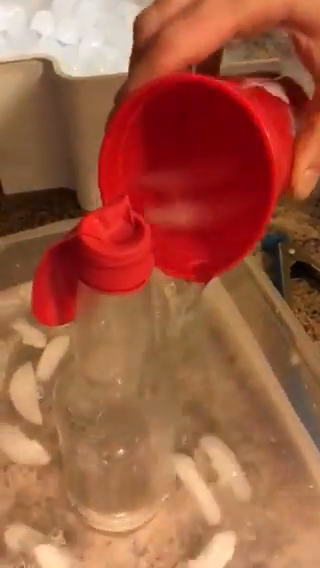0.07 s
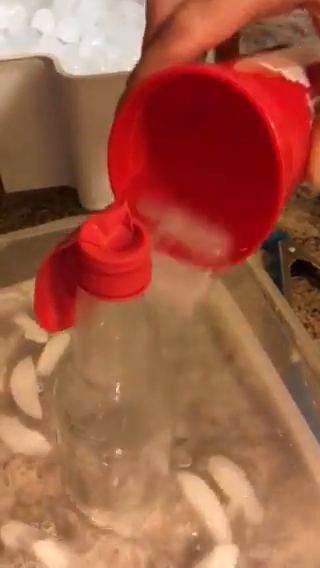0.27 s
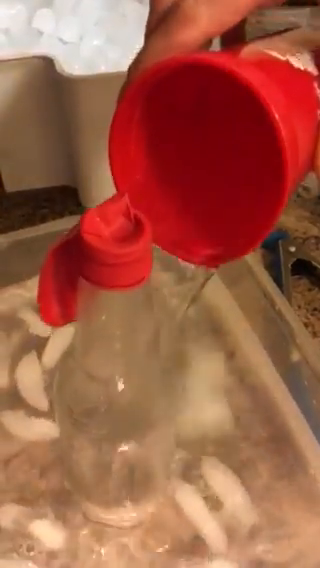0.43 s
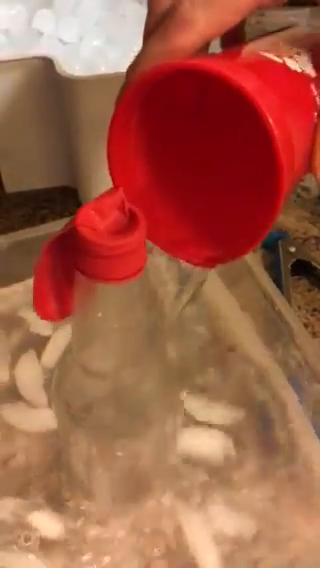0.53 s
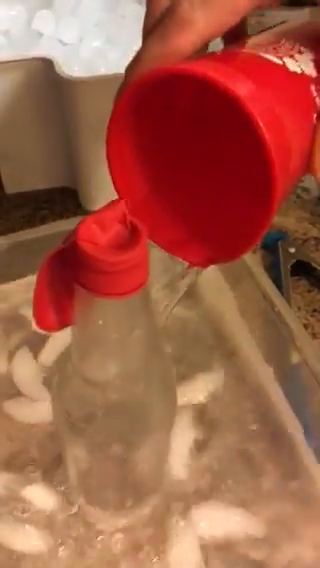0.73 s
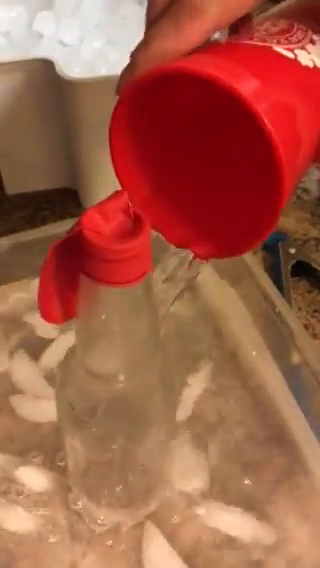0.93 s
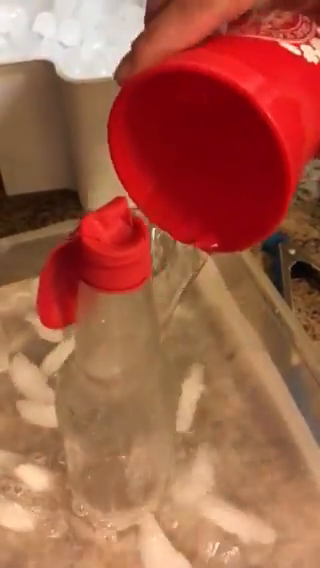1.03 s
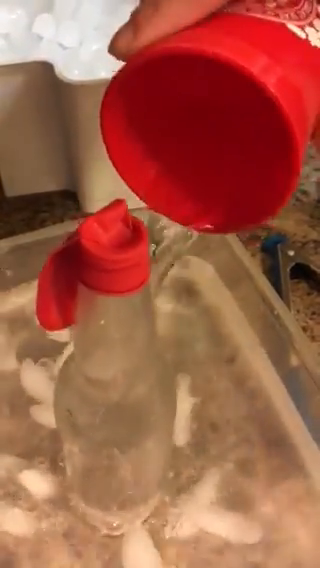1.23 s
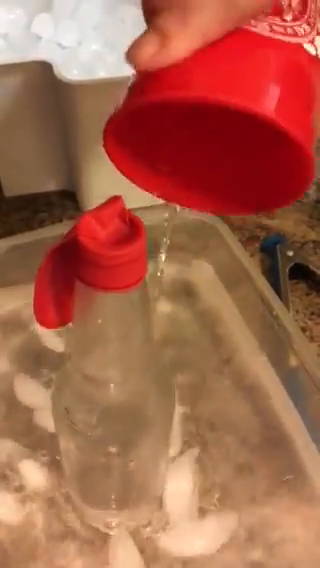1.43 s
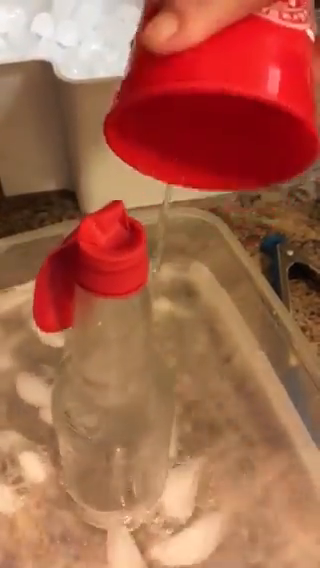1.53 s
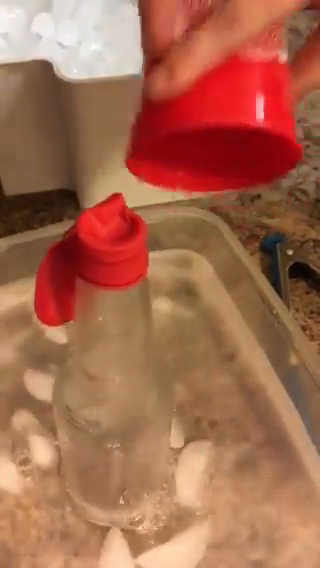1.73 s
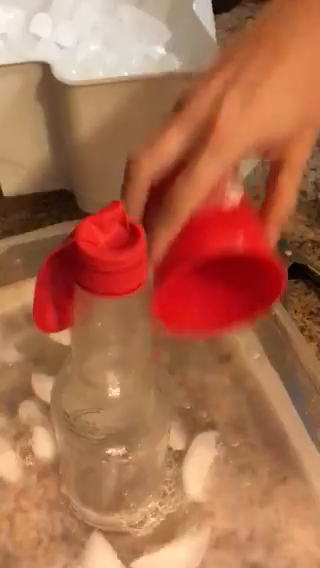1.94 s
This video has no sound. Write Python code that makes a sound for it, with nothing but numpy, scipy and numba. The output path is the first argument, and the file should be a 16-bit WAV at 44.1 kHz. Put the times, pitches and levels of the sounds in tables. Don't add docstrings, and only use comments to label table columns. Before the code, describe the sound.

Close phone pickup in a small kitchen: ice water pours, ice knocks hard on a glass bottle and plunges with a hollow tub boom, then floating ice taps and droplets thin out over faint fridge hum.

```python
import sys
import numpy as np
from scipy import signal
from scipy.fft import rfft, irfft
from scipy.io import wavfile
from scipy.ndimage import uniform_filter1d
from numba import njit

SR = 44100
rng = np.random.default_rng(int(sys.argv[2]) if len(sys.argv) > 2 else 0)


def voltage_ratio(level):
    return 10 ** (np.asarray(level, float) / 20)


def transcribe(u):
    v = np.clip(np.atleast_2d(u).T, -1, 1)
    q = np.round(v * 32767).astype(np.int16)
    wavfile.write(sys.argv[1], SR, q)


N = 88200

# [f/Hz, level/dB per Hz]
KITCHEN_AIR = [(25, -15), (60, 10.5), (300, -4), (900, -6), (3000, -20.5), (16000, -83)]
# [f/Hz, width/Hz, level/dB]
FRIDGE_HUM = [(119, 10, -58), (235.7, 16, -63.5), (419.7, 7.3, -67.5)]
# [t/s, level/dB]
FLOW = [(0, -48), (0.044, -59.5), (.14, -57), (0.202, -45), (.44, -37.5), (.49, -57), (.62, -37.5),
        (.75, -46), (1.0, -48.5), (1.3, -52), (1.6, -56), (1.7, -59.5), (2, -59.5)]
# [f/Hz, level/dB per Hz]
FIZZ = [(300, -57), (600, -18), (1100, -6.5), (3500, -4.5), (9000, -4), (16000, -11.5)]
# [t/s, level/dB, centre f/Hz, t60/s]
PLUNGES = [
    (0.554, -27, 2800, 0.1),
    (.558, -19.5, 2770, 0.068),
    (0.586, -21.5, 1260, 0.073),
    (.6, -34.5, 450, 0.27),
    (.628, -28, 1700, 0.056),
    (0.671, -29.5, 5500, 0.045),
]
# [t/s, level/dB]
BOOMS = [
    (.588, -24.5),
    (0.597, -30),
    (0.639, -28.5),
    (1.36, -40),
]
# [f/Hz, level/dB, t60/s]
TUB_MODES = [(144, 0, 0.14), (222.7, -1, 0.082)]
# [t/s, level/dB, f/Hz, t60/s]
GULPS = [(.586, -4, 774, 0.021), (.587, -11, 1047, 0.019), (.587, -11, 365, 0.025), (.59, -15, 1396, 0.033),
         (.595, -11.5, 691, 0.035), (.631, -13.5, 644, 0.027), (.598, -14, 205, 0.0226),
         (1.168, -29, 690, 0.024), (1.174, -31.5, 610, 0.02), (1.358, -30.5, 754, 0.018),
         (1.362, -41.5, 400, .02), (1.01, -36.5, 700, 0.022)]
# [t/s, peak level/dB, f/Hz]
TICKS = [(0.151, -45.5, 3860), (.159, -49, 5800), (0.177, -38, 9400), (.179, -34, 14900), (.19, -35, 3620),
         (.19, -37, 12800), (.207, -38, 7400), (.212, -39, 7400), (.225, -39, 10000), (.232, -32, 5960),
         (.236, -33, 4150), (.258, -46, 7400), (0.276, -40, 8000), (.327, -38, 13000), (.343, -28, 10000),
         (0.35, -34, 10000), (.397, -40, 12800), (.452, -39, 11600), (0.472, -46, 7500), (.482, -36, 10000),
         (0.542, -27.5, 11500), (0.55, -32, 6900), (0.559, -21, 6200), (0.59, -26, 8350),
         (0.626, -35, 6140), (.652, -26, 9360), (0.689, -32, 9700), (.761, -37, 9900), (.776, -29, 11900),
         (.909, -40.5, 10900), (.92, -37, 13500), (.936, -41, 4400), (.945, -35.5, 9300),
         (0.978, -34.5, 11500), (0.981, -42, 4020), (.998, -37, 6560), (1.022, -40, 8800),
         (1.045, -41, 7360), (1.09, -36.5, 6900), (1.092, -43, 12500), (1.129, -35.5, 9700),
         (1.173, -54, 11000), (1.19, -40.5, 3980), (1.19, -47, 13900), (1.228, -48, 12000),
         (1.268, -64, 12000), (1.347, -48, 12100), (1.382, -51, 11900), (1.41, -45, 13300),
         (1.413, -43.5, 9700), (1.613, -59, 9500), (1.731, -51, 6800), (1.729, -48.5, 2260),
         (1.746, -55, 6000), (1.767, -71.5, 6500), (1.802, -52, 5100), (1.848, -49, 7300),
         (1.893, -54.5, 7600), (1.95, -59, 7500), (1.992, -59, 8000)]
# [t/s, peak level/dB, f/Hz]
BUBBLES = [(.203, -26.5, 1014), (0.221, -48, 1420), (.265, -31.5, 1052), (0.278, -44, 1082),
           (.35, -28, 2120), (.428, -27.5, 819), (0.48, -35, 1336), (.559, -21.5, 1030),
           (0.693, -34.5, 2520), (.714, -36, 987), (0.802, -35, 1154), (0.847, -35.5, 1155),
           (.858, -37.5, 790), (0.956, -38, 1870), (1.053, -44.5, 1100), (1.092, -39.5, 1127),
           (1.105, -33, 2530), (1.115, -40, 1117), (1.129, -33.5, 2020), (1.152, -37.5, 1327),
           (1.272, -30.5, 2540), (1.333, -38.5, 1153), (1.398, -35, 1266), (1.451, -37.5, 2470),
           (1.462, -35.5, 1490), (1.532, -34.5, 1205), (1.572, -41, 2170), (1.591, -34.5, 1096),
           (1.616, -32, 1928), (1.856, -44, 2430), (1.952, -50.5, 1080)]
# [t/s, peak level/dB, upper rings against main ring/dB]
TAPS = [(0.0164, -44, -39), (0.256, -33.5, -7), (0.413, -28.5, -10), (0.4691, -36, -8), (.478, -35, -10),
        (0.5077, -27.5, -1), (0.7152, -24.5, 0), (0.773, -38, -11), (0.801, -35, 2.5), (.805, -30.5, -4.5),
        (0.8458, -31, -0.5), (0.946, -39.5, -9), (1.029, -33.5, -8), (1.0936, -50.5, 12.5),
        (1.116, -38, -22), (1.131, -50, 12.5), (1.19, -46, 5), (1.226, -45.5, -1), (1.2542, -36.5, -0.5),
        (1.262, -35, -24), (1.3297, -39, 0.5), (1.3833, -48.5, 8.5), (1.4603, -44, 4.5), (1.492, -38, 0),
        (1.522, -24.5, -3.5), (1.5321, -27, -6), (1.5897, -40, 4.5), (1.621, -35, 0.5), (1.727, -38, -9),
        (1.813, -50.5, -8), (1.8557, -55, -31), (1.891, -50, -22), (1.954, -54.5, -18)]
# [f/Hz, level/dB, t60/s]
BODY_MODES = [(3258, 0, .032), (3270, -16, .09), (3170, -9, .035), (3370, -13, .03)]
# [f/Hz, level/dB, t60/s]
UPPER_MODES = [(4710, 1.5, 0.065), (4570, -6.5, 0.078), (5260, -12, 0.077), (7080, -7, 0.04),
               (9690, -8, 0.029), (8040, -14, .03)]
# [t/s, peak level/dB, then low, middle and high parts against it/dB]
CLACKS = [(0.2445, -30.5, -2.5, -4.5, -8), (0.2941, -14.5, -18, -2.5, -17.5), (.2975, -13, -31.5, -8, -13),
          (.3117, -25.5, -15.5, -6, -22), (.3155, -19, -23, -19, -31), (0.353, -34.5, 0, -3, -4),
          (0.39, -39, 2.5, 17, 6), (.4133, -29, -7, 5, 5), (0.4442, -28.5, -42, -5, -11.5),
          (0.5026, -23.5, -27.5, -24, 8), (.5075, -23.5, -23.5, -28, 1)]
# [f/Hz, level/dB, t60/s]
CUP_LOW_MODES = [(845.3, 0.38, 0.081), (934, 1.5, 0.02)]
# [f/Hz, level/dB, t60/s]
CUP_MID_MODES = [(2095, 3, 0.019), (2185, 5.4, 0.014)]
# [f/Hz, level/dB, t60/s]
SHOULDER_MODES = [(4138, 5, 0.047), (3890, -8, 0.14), (5020, -14.5, 0.089), (5190, -10, .07)]
# [f/Hz, level/dB, t60/s]
NECK_MODES = [(10000, 7.5, 0.019), (4890, 1, 0.052), (4500, -8, 0.12), (9110, 8, 0.016), (8750, -37, 0.035),
              (8130, -8.5, 0.074), (11400, -38, 0.026)]


def level(x, db):
    return x * voltage_ratio(db) / np.sqrt(np.mean(x ** 2))


def shape(points, hz):
    p = np.array(points)
    return np.interp(np.log(np.maximum(hz, 1)), np.log(p[:, 0]), p[:, 1])


def colour(x, points):
    hz = np.arange(len(x) // 2 + 1) * SR / len(x)
    return irfft(rfft(x) * voltage_ratio(shape(points, hz)), len(x))


def band(x, hz, width):
    b, a = signal.iirpeak(hz, hz / width, SR)
    return signal.lfilter(b, a, x)


def flicker(count, size):
    steps = np.repeat(rng.standard_normal(count // size + 1), size)
    return uniform_filter1d(steps, size // 2)[:count]


@njit
def grains(n, start, hz, t60, size, glide, rise):
    out = np.zeros(n)
    for k in range(len(start)):
        fall = np.exp(-np.log(1000) / (t60[k] * SR))
        turn = 2 * np.pi * hz[k] / SR
        phase, height, unrisen = 0., size[k], 1.
        for i in range(int(start[k] * SR), min(n, int((start[k] + t60[k]) * SR))):
            phase += turn
            turn = min(turn * (1 + glide[k] / SR), 2.8)
            height *= fall
            unrisen *= np.exp(-1 / (rise * SR))
            out[i] += height * (1 - unrisen) * np.sin(phase)
    return out


def strike(s, db, modes, scatter_db, detune, rise_s, tune, bounce_db=-10.5):
    bounce_s = 0.0099
    hz, mode_db, t60 = np.array(modes, float).T
    chance = rng.standard_normal((len(s), 2, len(hz), 3))
    again = np.arange(2)[:, None]

    def full(v):
        return np.ascontiguousarray(np.broadcast_to(v, chance.shape[:3])).ravel() * 1.

    start = s[:, None, None] + again * bounce_s * voltage_ratio(2.4 * chance[:, :, :1, 2])
    pitch = tune[:, None, None] * hz * (1 + detune * chance[..., 0])
    loud = db[:, None, None] + again * bounce_db + mode_db + min(scatter_db, 4) * chance[..., 1]
    return grains(N, full(start), full(pitch), full(t60), full(voltage_ratio(loud)), full(0.), max(rise_s, 1e-5))


def bursts(s, db, hz, width, t60):
    grain_db = 1
    out = np.zeros(N + SR)
    t = np.arange(4410) / SR
    for start_s, puff_db, centre, fall_s in np.broadcast(s, db, hz, t60):
        noise = rng.standard_normal(len(t))
        puff = level(band(band(noise, centre, width * centre), centre, width * centre), puff_db)
        first = int(start_s * SR)
        out[first:first + len(t)] += puff * voltage_ratio(-60 * t / fall_s + grain_db * flicker(len(t), size=70))
    return out[:N]


def kitchen():
    hum = sum(level(band(rng.standard_normal(N), hz, width), db) for hz, width, db in FRIDGE_HUM)
    return level(colour(rng.standard_normal(N), KITCHEN_AIR), -57) + hum


def stream():
    when, place, luck, length = rng.random((3000, 4)).T.copy()
    hz = 600 * 25 ** place
    db = shape(FIZZ, hz) + 10 * np.log10(hz) - 2.68 * np.log(luck + 0.003)
    fizz = grains(N, when * N / SR, hz, (6 + 30 * length ** 2) / hz, voltage_ratio(db), hz / 150, 0.00064)
    spray = colour(rng.standard_normal(N), FIZZ)
    patter = rng.standard_normal(N) * voltage_ratio(9.1 * flicker(N, size=600))
    rings = [(3272, 2), (4645, -2.5), (1092.0, 6), (835, -12.5)]  # f/Hz, level/dB
    sing = sum(voltage_ratio(ring_db) * band(patter, ring_hz, 36.0) for ring_hz, ring_db in rings)
    flow_s, flow_db = np.array(FLOW).T
    flow = voltage_ratio(np.interp(np.arange(N) / SR, flow_s, flow_db))
    return flow * (level(fizz, -4.5) + level(spray, -10.0) + level(sing, -6.5))


def plunges():
    s, db, hz, t60 = np.array(PLUNGES).T
    boom_s, boom_db = np.array(BOOMS).T
    slosh_db, slosh_t60_s = -47.5, 2.2
    t = np.arange(N) / SR - boom_s[0]
    slosh = level(band(rng.standard_normal(N), 103, 36.0), slosh_db)
    slosh = slosh * voltage_ratio(-60 * t / slosh_t60_s) * (t > 0)
    gulp_s, gulp_db, gulp_hz, gulp_t60 = np.array(GULPS).T.copy()
    gulp = grains(N, gulp_s, gulp_hz, gulp_t60, voltage_ratio(gulp_db), 3.2 + 0 * gulp_s, 0.0026)
    splash = bursts(s, db, hz, 1.42, t60)
    boom = strike(boom_s, boom_db, TUB_MODES, 3.5, 0.02, 0.0084, 1 + 0 * boom_s)
    return gulp + splash + boom + slosh


def ticks():
    s, db, hz = np.array(TICKS, float).T.copy()
    click = grains(N, s, hz, 45 / hz, voltage_ratio(db + 7), 10. + 0 * s, 0.00018)
    crack = bursts(s, db - 5, hz, 1.0, 0.018)
    hiss = bursts(s, db - 17.5, hz, 1.5, 0.11)
    return click + crack + hiss


def bubbles():
    s, db, hz = np.array(BUBBLES, float).T.copy()
    cycles = 53
    pop = grains(N, s - .001, hz * .98, cycles / hz, voltage_ratio(db + 3.0), 1.6 + 0 * s, 0.0012)
    return pop + bursts(s, db - 12, hz, 0.47, 0.088)


def taps():
    s, db, up = np.array(TAPS).T
    s = s - .001
    wobble_db, splash_s = 3, .71

    def waver(x):
        return x * voltage_ratio(wobble_db * flicker(N, size=250))

    def load(sag, drain_s):
        return 1 - sag * np.exp(-np.abs(s - splash_s) / drain_s)

    main = waver(strike(s, db + 8, BODY_MODES, 1.1, 0.0072, 0.0033, load(.045, 0.098), bounce_db=-16))
    upper = waver(strike(s, db + up - 5, UPPER_MODES, 3.7, 0.0051, 0.0035, load(0.0407, 0.51)))
    return main + upper + bursts(s, db + up - 8.5, 2360, 2.05, 0.067)


def clacks():
    s, db, low, mid, high = np.array(CLACKS).T

    def hit(hit_db, modes, scatter_db, detune, rise_s):
        return strike(s, hit_db, modes, scatter_db, detune, rise_s, 1 + 0 * s, bounce_db=-14)

    shoulder = hit(db - 7, SHOULDER_MODES, 2.8, 0.0031, 0.0001)
    cup = hit(db + low + 1.5, CUP_LOW_MODES, 0.46, 0.011, 0.00022)
    cup = cup + hit(db + mid - 2, CUP_MID_MODES, 5.0, 0.027, 0.00089)
    neck = hit(db + high - 8, NECK_MODES, 2.8, 0.011, 0.00028)
    crack = bursts(s, db + high, 6800, 1.75, 0.016) + bursts(s, db + mid - 6.5, 2170, 1.8, 0.03)
    return shoulder + cup + neck + crack


def scene():
    near = taps() + clacks() + bubbles() + ticks() + plunges() + stream()
    room_t60_s, room_db = 0.12, -13.5
    t = np.arange(int(.3 * SR)) / SR
    tail = band(rng.standard_normal(len(t)), 1900, 5700) * voltage_ratio(-60 * t / room_t60_s) * (t > .003)
    wet = signal.fftconvolve(near, tail / np.sqrt(np.sum(tail ** 2)))[:N]
    return (near + voltage_ratio(room_db) * wet + kitchen())[None]


def top_cut(x):
    return signal.sosfilt(signal.butter(12, 17090, fs=SR, output="sos"), x)


def record(dry):
    top_hz = 15900
    low_pass = signal.ellip(5, 1, 22, top_hz, fs=SR, output="sos")
    mix = signal.sosfilt(low_pass, dry)
    return top_cut(mix)


dry = scene()
out = record(dry)
transcribe(out)
```